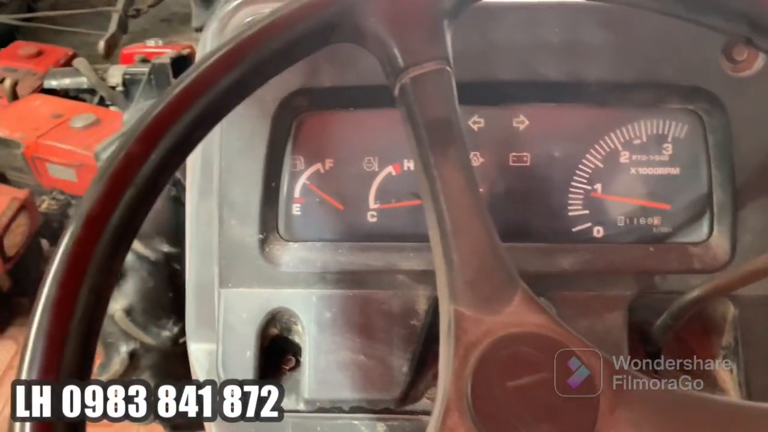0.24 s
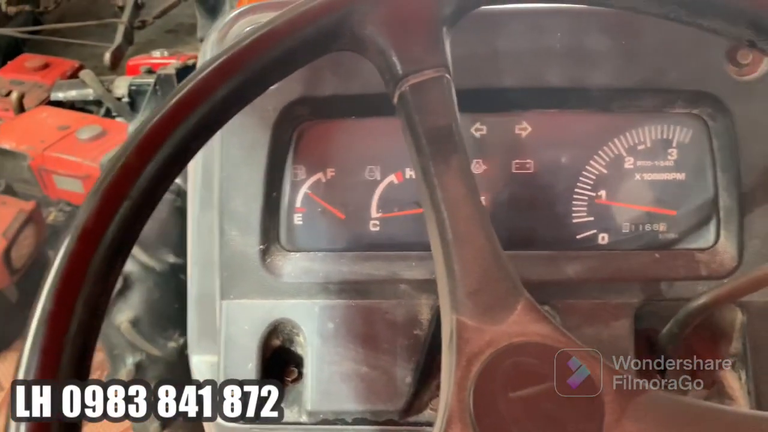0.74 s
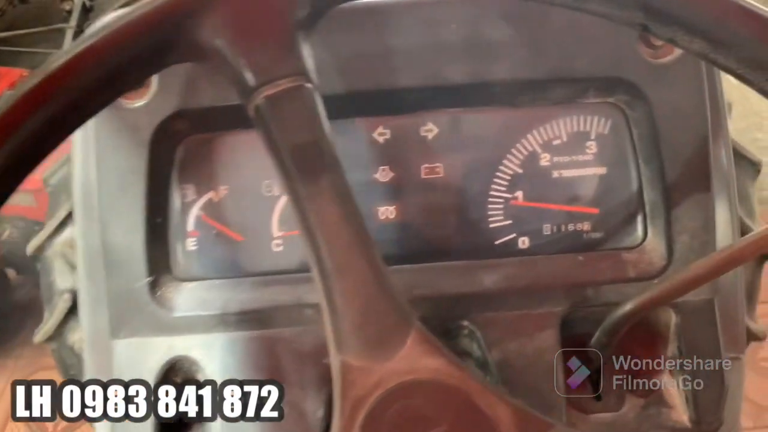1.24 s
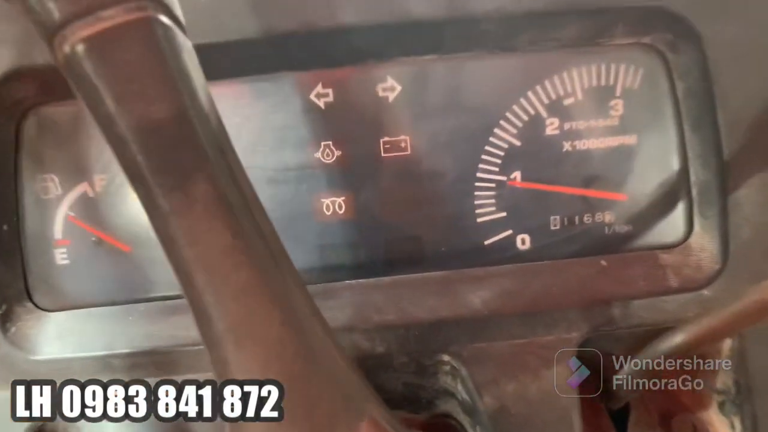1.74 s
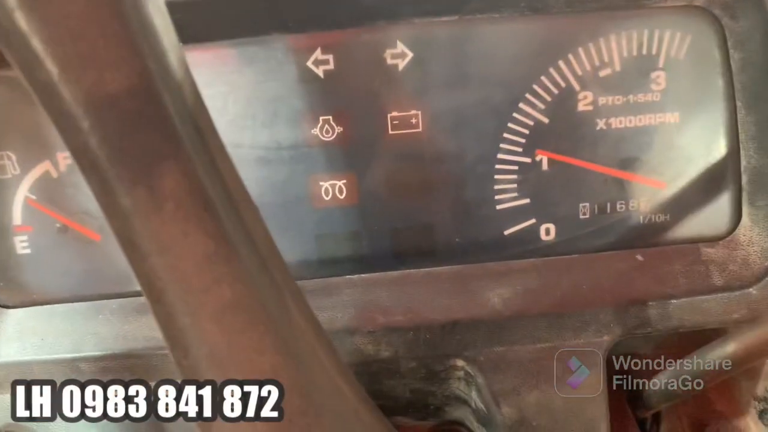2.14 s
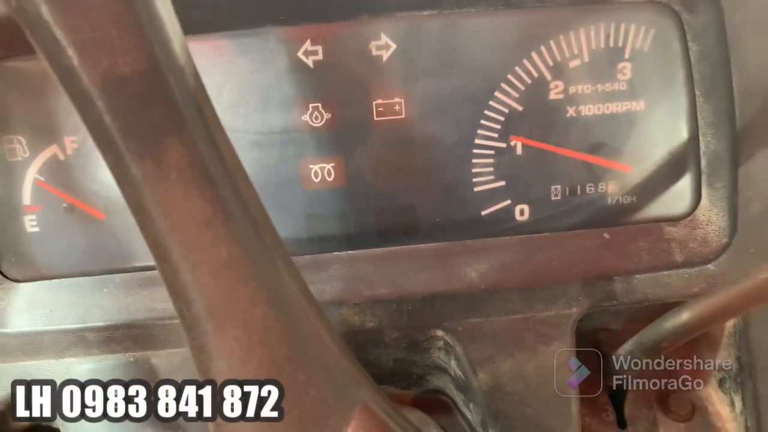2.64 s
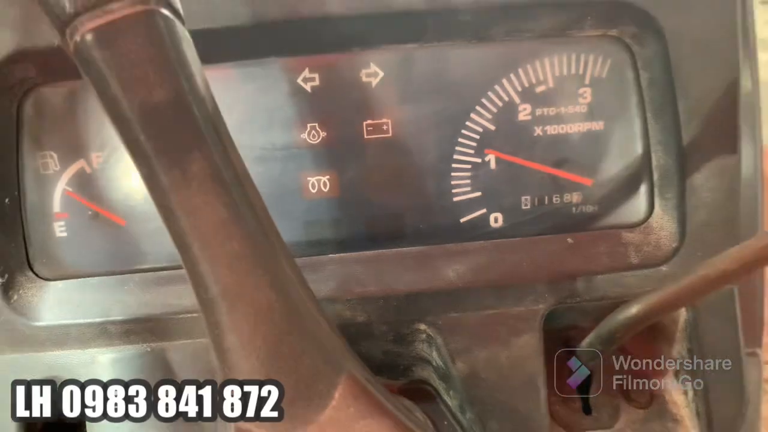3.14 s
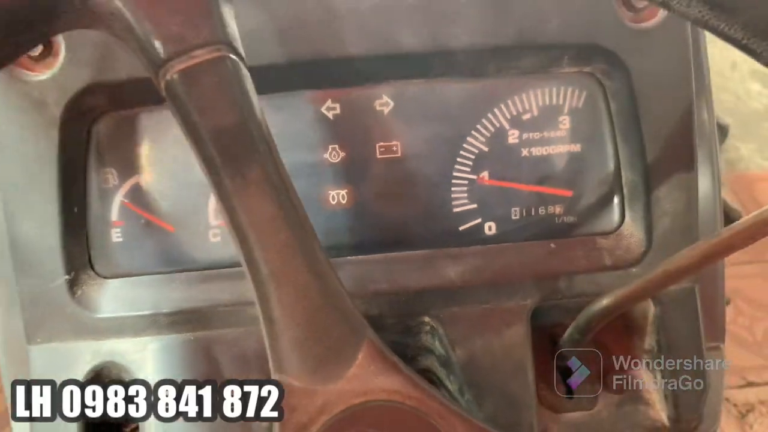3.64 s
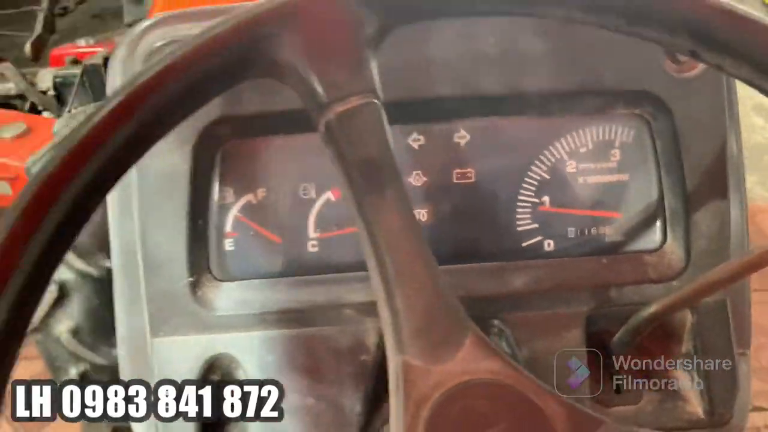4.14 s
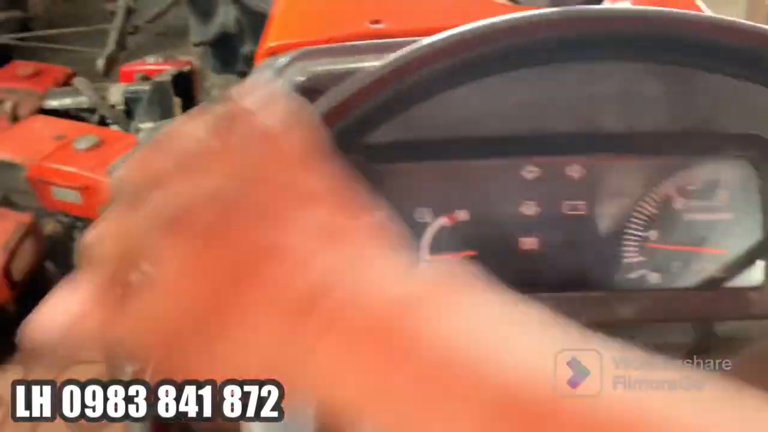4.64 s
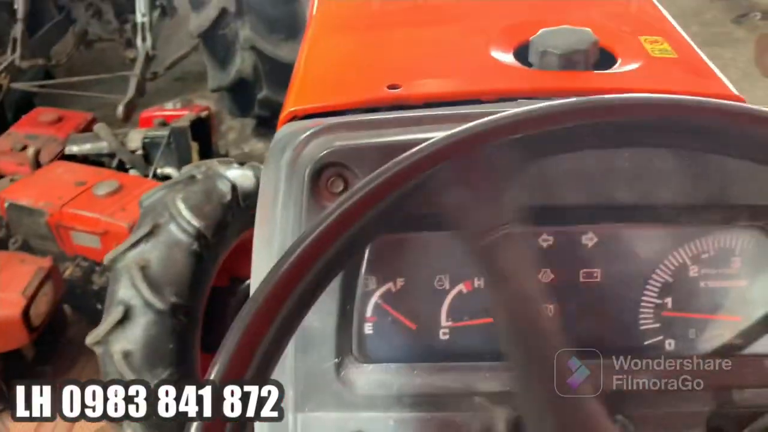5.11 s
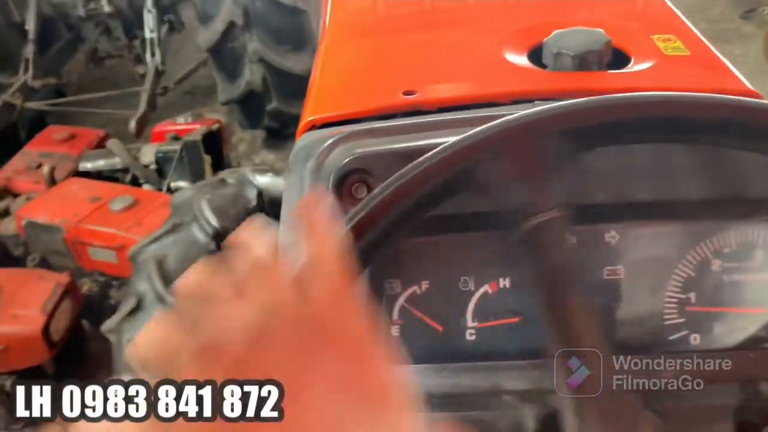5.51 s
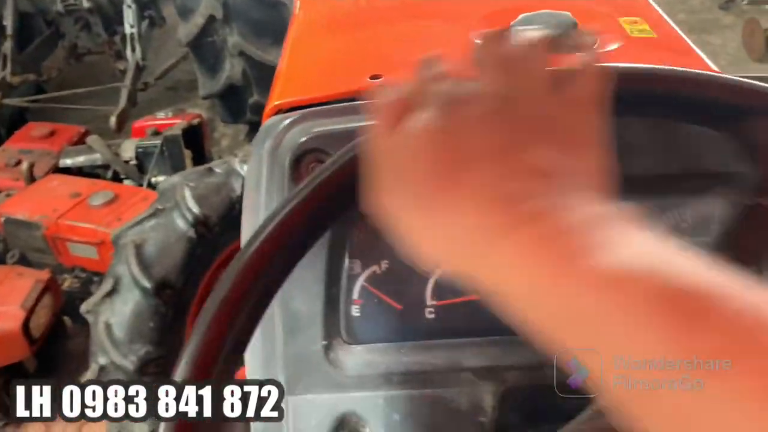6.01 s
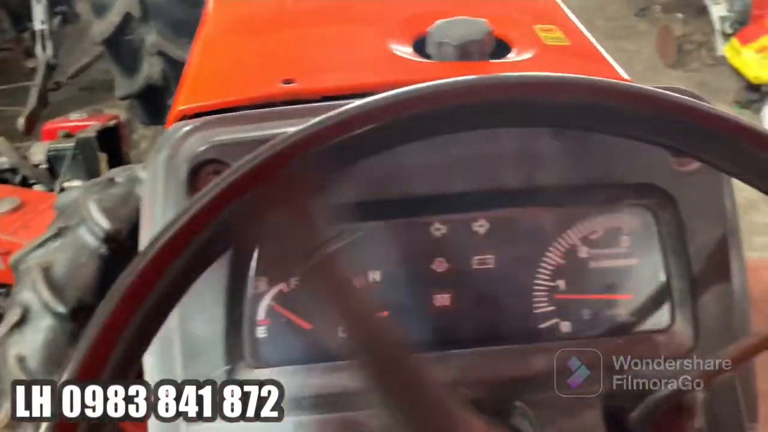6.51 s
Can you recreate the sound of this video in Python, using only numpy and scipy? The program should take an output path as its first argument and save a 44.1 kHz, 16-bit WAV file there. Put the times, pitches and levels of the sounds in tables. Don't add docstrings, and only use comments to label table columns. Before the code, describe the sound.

A diesel tractor engine idles roughly up close in a workshop, revved in four quick swells, then settles into a steady clattering idle.

```python
import sys
import numpy as np
from scipy import signal
from scipy.fft import rfft, irfft, next_fast_len
from scipy.io import wavfile
from scipy.ndimage import uniform_filter1d, map_coordinates

SR = 44100
rng = np.random.default_rng(int(sys.argv[2]) if len(sys.argv) > 2 else 0)


def ratio_of_db(decibels):
    return 10 ** (np.asarray(decibels, float) / 20)


def store_pcm(level_fs):
    pcm = np.round(np.clip(level_fs, -1, 1) * 32767).astype(np.int16)
    wavfile.write(sys.argv[1], SR, np.atleast_2d(pcm).T)


N = 298538

# time_s, rate_firings_per_s
SPEED = [(0.0, 26.23), (0.126, 27.53), (0.331, 40.45), (0.776, 24.79), (0.895, 24.22), (1.093, 36.5),
         (1.455, 24.15), (1.587, 27.18), (1.939, 54.33), (2.547, 28.21), (2.633, 38.72), (2.797, 50.21),
         (3.534, 22.56), (3.719, 25.42), (4.627, 25.4), (4.857, 25.18), (6.445, 25.83), (6.77, 25.6)]
START_FIRINGS, IDLE_FIRINGS_PER_S = 0.63, 25.5
# press_s, release_s, depth_0_to_1
PEDAL = [
    (0.134, 0.305, 0.76),
    (0.909, 1.068, 0.95),
    (1.553, 1.89, 1),
    (2.527, 2.812, 0.88),
    (3.49, 3.53, 0.28),
    (3.62, 3.695, 0.26),
]
PRESS_S, RELEASE_S = 0.012, 0.049
# time_s, pipe_nearness_db, bonnet_nearness_db, fan_nearness_db
SEAT = [(0, 2, 2, 1), (.8, 0, -0.5, 0.5), (2, 1, -0.5, -1), (3.5, -2.5, -1, -1.5), (4.8, 0.5, 1.5, 2.5),
        (5.15, -4.5, 1.5, 5.5), (5.45, -3.5, 2, 3), (5.65, 2.5, 1, 2), (6.77, 6, 2.5, 4)]
# idle_db, per_speed_doubling_db, full_pedal_db, fuel_cut_db
EXHAUST_LAW = (-27, 6.5, 3, -1)
BLOCK_LAW = (-29, 2, 5, -1)
FAN_LAW = (-42.5, 10, 6.5, 0)
# freq_hz, density_db_per_hz
HISS = [(2500, -6), (4000, -6), (5500, -9), (7500, 0), (9000, 4.5), (11000, 2), (13000, -4), (15500, -4.5),
        (17000, -51)]
# freq_hz, width_hz, rms_db, start_s, end_s
WHINES = [(5225, 30, -53.5, 4.7, 6.05), (5140, 55, -56, 4.46, 5.9), (7020, 25, -51.5, 2.34, 3.42),
          (5200, 56, -43, 7.3, 8.2)]
PORT_LAG_S, PORT_TURN_RAD = 1 / 5150, 0.94
# exhaust_db, exhaust_lag_s, low_knock_db, high_knock_db, low_mode_hz, high_mode_hz
CYLINDERS = [(5, 0, 9.5, 5, 522, 930), (1, .003, -4, -2, 560, 1840), (0, -.006, -4, 1, 510, 1460),
             (-1, -.004, 4, 2.5, 575, 1000)]
# freq_hz, width_hz, level_db
SUMP_MODES = [(632.5, 10, -8.5), (776, 25, -9), (458, 36.6, -1), (392, 86, -7.5)]
# freq_hz, width_hz, level_db
BLOCK_MODES = [(953, 227, 1.5), (1590, 310, -1), (1780, 230, 1), (2600, 160, -15), (3400, 340, -13)]
# freq_hz, width_hz, level_db
PANEL_MODES = [(689, 9.7, -1), (795.4, 5.8, 1), (1090, 13, -43), (1322, 12, -5), (2118, 8, -14.5)]
# freq_hz, width_hz, level_db
HEAD_MODES = [(1844, 106, 5.5), (2630, 470, -11.5), (3432, 38, 9.5), (3420, 165, 5.5), (4640, 260, -23)]
# freq_hz, width_hz, level_db, start_s, end_s
COVERS = [(1810, 18, -47, 2.6, 3.2), (1865, 42, -7.5, 3.9, 4.65), (1468, 25, -15.5, 4.34, 8.8),
          (933, 19, -7.5, 4.6, 7.8), (1060, 44, -5, 2.6, 2.6), (997, 100, -6, 0.11, 1.1)]
# freq_hz, density_db_per_hz
CLATTER = [(190, -5), (330, -10.5), (426, -6), (516, -0.5), (720, -8), (807, -7), (1130, -10), (1530, -7.5),
           (1720, -12.5), (1850, -8), (2190, -14), (2900, -18.5), (7000, -32.5), (9100, -69), (15400, -120)]
# freq_hz, t60_s
SHOP = [(100, 0.31), (500, 0.61), (2000, 0.16), (8000, 0.26)]
KNOCK_SCATTER_DB, CLATTER_PATCH_DB = 1.1, 1.6
ROAR_DB = 4.5
# freq_hz, width_hz, level_db
PIPE_MODES = [(138, 65, -4), (159.7, 53.7, 1.5), (188.3, 18.2, 2), (266.6, 48, -4.5), (290, 70, -6.5),
              (377, 35, -11)]
# freq_hz, rms_db
SILENCER = [(24, -66), (50, -31.5), (68, -22), (98, -23), (118, -37.5), (150, -23.5), (220, -21.5)]
# freq_hz, density_db_per_hz
RUMBLE = [(18, -36), (30, -14), (69, 1), (123, -0.5), (172, -1), (237, -5), (420, -18), (550, -18.5),
          (920, -120)]
ORDER_DB = [12, -0.5, -4.5, -5]
ORDER_PHASE_RAD = [-3, 1.37, -2, 2.42]
PEDAL_TONE_DB, FLUTTER_DB = 2, 4.5
PUFF_NOISE_SHARE, PUFF_SEAT_SHARE = 0.12, 0.08
# freq_hz, correlation
ALIKE = [(60, 0.59), (130, 0.84), (290, 0.74), (640, 0.4), (1410, 0.02), (3100, -0.064), (6820, -0.24),
         (15000, -1)]
# freq_hz, left_minus_right_db
LEAN = [(60, -4.5), (110, -0.5), (200, -5), (380, -1.5), (700, -2), (1290, 0.5), (2380, 0), (4400, -5.5),
        (8120, -4), (15000, 5)]
TOP_HZ = 15750


def unit(x):
    return x / np.sqrt(np.mean(x ** 2) + 1e-20)


def along(points, hz):
    f, v = np.transpose(points)
    return np.interp(np.log(hz + 1), np.log(f + 1), v)


def curves(rows):
    s, *cols = np.transpose(rows)
    return [np.interp(np.arange(N) / SR, s, c) for c in cols]


def during(start_s, end_s):
    return np.interp(np.arange(N) / SR, [start_s - .15, start_s, end_s, end_s + .15], [0, 1, 1, 0])


def filtered(x, response):
    m = next_fast_len(N + SR // 2)
    return irfft(rfft(x, m) * response(np.fft.rfftfreq(m, 1 / SR)), m)[..., :N]


def modes(table):
    def response(f):
        total = 0
        for k, (hz, width_hz, db) in enumerate(table):
            damping = 1j * f * width_hz
            total = total + (-1) ** k * ratio_of_db(db) * damping / (hz * hz - f * f + damping)
        return total
    return response


def steep(response, top_hz):
    return lambda f: response(f) / (1 + 1j * f / top_hz) ** 2


def patchy(patchy_db):
    z = signal.stft(rng.standard_normal((2, N + 512)), nperseg=512)[2]
    field = uniform_filter1d(rng.standard_normal(z.shape[1:]), size=5, axis=0)
    field = uniform_filter1d(field, size=10, axis=1)
    return signal.istft(z * ratio_of_db(patchy_db * unit(field)), nperseg=512)[1][:, :N]


def spread(pair):
    def rotation(hz):
        angle = np.arccos(np.clip(along(ALIKE, hz), -1, 1)) / 2
        return np.array([np.cos(angle), np.sin(angle)])
    mid, side = filtered(pair, rotation)
    return np.array([mid + side, mid - side])


def shop(x):
    hz, t, z = signal.stft(rng.standard_normal((2, SR // 2)), SR, nperseg=256)
    decay = ratio_of_db(-60 * t / along(SHOP, hz)[:, None])
    tail = signal.istft(z * decay, SR, nperseg=256)[1]
    return signal.fftconvolve(x, tail / np.linalg.norm(tail[0]), axes=1)[:, :N]


def pedal():
    t = np.arange(N) / SR
    total = 0
    for down_s, up_s, depth in PEDAL:
        press = np.clip((t - down_s) / PRESS_S, 0, 1)
        total = total + depth * press * np.exp(-np.clip(t - up_s, 0, None) / RELEASE_S)
    return total


def crank():
    rate, = curves(SPEED)
    done = START_FIRINGS + np.cumsum(rate) / SR
    acceleration = uniform_filter1d(np.gradient(rate) * SR, size=2000)
    fuel = np.clip(1 + acceleration / 32, .15, 1.6)
    where = np.flatnonzero(np.diff(np.floor(done)) > 0)
    return done, fuel, where, np.floor(done[where + 1]).astype(int) % 4


def loudness(law, fuel):
    idle_db, speed_db, pedal_db, cut_db = law
    octaves = np.log2(curves(SPEED)[0] / IDLE_FIRINGS_PER_S)
    return idle_db + speed_db * octaves + pedal_db * pedal() + cut_db * np.clip(1 - fuel, 0, 1)


def train(where, size):
    return np.bincount(np.clip(where, 0, N - 1), size, N)


def puffs(impulses, t60_s, noise_share, rise_s):
    t = np.arange(SR // 10) / SR
    fade = ratio_of_db(-60 * t / t60_s) * (1 - np.exp(-t / rise_s))
    gate = np.abs(signal.fftconvolve(impulses, fade / np.linalg.norm(fade))[:N])
    share = np.clip(noise_share, 0, 1)
    blow = np.sqrt(1 - share) * impulses * [[1], [.5]]
    return blow + np.sqrt(share) * gate * rng.standard_normal((2, N))


def fan(done, fuel):
    level_db = loudness(FAN_LAW, fuel) + curves(SEAT)[2]
    near, far = filtered(patchy(patchy_db=2.0), lambda hz: ratio_of_db(along(HISS, hz)))
    near = unit(near) * ratio_of_db(level_db - 0.5 + 0.77 * np.cos(2 * np.pi * done - .6))
    for hz, width_hz, db, start_s, end_s in WHINES:
        whine = unit(filtered(rng.standard_normal(N), modes([(hz, width_hz, 0)])))
        near = near + ratio_of_db(db) * during(start_s, end_s) * whine

    def port_delay(hz):
        half_phase_rad = np.pi * hz * PORT_LAG_S - PORT_TURN_RAD / 2
        return np.exp(1j * half_phase_rad * np.array([[-1], [1]]))
    direct = filtered(near, port_delay)
    scattered = unit(filtered(far, lambda hz: 1 / (1 + (hz / 6000) ** 9)))
    return direct + ratio_of_db(level_db + 3.5) * scattered * [[1], [0]]


def gear_clatter(done, fuel):
    valves = ratio_of_db(2.2 * np.clip(fuel, 0, 1) * np.cos(2 * np.pi * done - 1.5))
    return unit(filtered(patchy(CLATTER_PATCH_DB) * valves, lambda hz: ratio_of_db(along(CLATTER, hz))))


def block_knock(fuel, where, cylinder, fast):
    scatter_db = KNOCK_SCATTER_DB * rng.standard_normal((len(where), 2))
    low, high, blows = 0, 0, 0
    for k, (_, _, low_db, high_db, low_hz, high_hz) in enumerate(CYLINDERS):
        own = fuel[where] * (cylinder == k)
        thud = train(where, own * ratio_of_db(low_db - 10 * fast[where] + scatter_db[:, 0]))
        thud = puffs(thud, t60_s=.04, noise_share=.14, rise_s=.002)
        rap = train(where, own * ratio_of_db(high_db + scatter_db[:, 1]))
        rap = puffs(rap, t60_s=.04, noise_share=.65, rise_s=.0015)
        low = low + filtered(thud, steep(modes([(low_hz, 60, 0)] + SUMP_MODES), top_hz=1190))
        high = high + filtered(rap, steep(modes([(high_hz, 90, 2)] + BLOCK_MODES), top_hz=3930))
        blows = blows + rap
    knock = ratio_of_db(-2.5) * unit(low) + ratio_of_db(-5.5) * unit(high)
    knock = knock + ratio_of_db(-4.5) * fast * unit(filtered(blows, modes(PANEL_MODES)))
    for hz, width_hz, db, start_s, end_s in COVERS:
        cover = unit(filtered(blows, modes([(hz, width_hz, 0)])))
        knock = knock + ratio_of_db(db) * during(start_s, end_s) * cover
    crackle = unit(filtered(blows, steep(modes(HEAD_MODES), top_hz=5270)))
    knock = knock + ratio_of_db(-6.5) * np.clip(fuel - 1, 0, 1) * crackle
    return knock + ratio_of_db(-7) * shop(knock)


def block(done, fuel, where, cylinder):
    level_db = loudness(BLOCK_LAW, fuel) + curves(SEAT)[1]
    fast = np.clip(curves(SPEED)[0] / 26 - 1, 0, 1)
    knock = block_knock(fuel, where, cylinder, fast)
    return ratio_of_db(level_db) * (knock + ratio_of_db(2.0 + ROAR_DB * fast) * gear_clatter(done, fuel))


def exhaust_tones(done, coasting, near_db):
    rate, = curves(SPEED)
    tones = 0
    for k, order_db in enumerate(ORDER_DB):
        uneven = map_coordinates(rng.standard_normal(199), [np.arange(N) * 18 / SR])
        flutter = map_coordinates(rng.standard_normal(99), [np.arange(N) * 14 / SR])
        db = along(SILENCER, (k + 1) * rate) + order_db + near_db
        db = db + PEDAL_TONE_DB * pedal() + FLUTTER_DB * (0.27 + coasting) * uneven
        phase_rad = 2 * np.pi * (k + 1) * done + ORDER_PHASE_RAD[k] + 1.65 * coasting * flutter
        tones = tones + 2 ** .5 * ratio_of_db(db) * np.cos(phase_rad)
    return tones


def exhaust_throb(where, cylinder, coasting):
    size_db, lag_s = np.transpose(CYLINDERS)[:2, cylinder]
    slack = coasting[where]
    scatter = rng.standard_normal((len(where), 2))
    lag_s = lag_s + (0.00093 + 0.00301 * slack) * scatter[:, 0]
    size_db = size_db - 4.7 * slack + 1.2 * scatter[:, 1]
    blows = train(where + np.round(lag_s * SR).astype(int), ratio_of_db(size_db))
    blows = puffs(blows, t60_s=0.027, noise_share=PUFF_NOISE_SHARE, rise_s=0.01)
    return unit(filtered(blows, steep(modes(PIPE_MODES), top_hz=600)))


def exhaust(done, fuel, where, cylinder):
    near_db = curves(SEAT)[0]
    level_db = loudness(EXHAUST_LAW, fuel) + PUFF_SEAT_SHARE * near_db
    coasting = np.clip(1 - fuel, 0, 1)
    tones = exhaust_tones(done, coasting, near_db)
    throb = exhaust_throb(where, cylinder, coasting)
    rumble = unit(filtered(patchy(patchy_db=-0.5), lambda hz: ratio_of_db(along(RUMBLE, hz))))
    return tones * [[1], [0]] + ratio_of_db(level_db) * (ratio_of_db(-0.5) * throb + rumble)


def scene():
    done, fuel, where, cylinder = crank()
    hiss = fan(done, fuel)
    engine = block(done, fuel, where, cylinder) + exhaust(done, fuel, where, cylinder)
    return hiss + spread(engine)


def roll_off(x):
    return signal.sosfilt(signal.butter(12, 17090, fs=SR, output="sos"), x)


def record(dry):
    def colour(hz):
        balance = ratio_of_db(along(LEAN, hz) / 2 * np.array([[1], [-1]]))
        return balance / np.sqrt(1 + (38 / (hz + 1)) ** 6)
    x = filtered(dry, colour)
    x = x / (1 + np.abs(x / .97) ** 6) ** (1 / 6)
    mix = filtered(x, lambda hz: hz < TOP_HZ)
    return roll_off(mix)


dry = scene()
out = record(dry)
store_pcm(out)
```